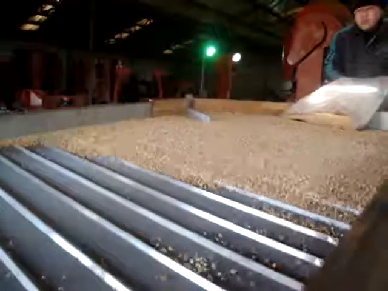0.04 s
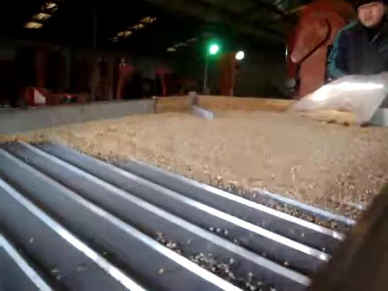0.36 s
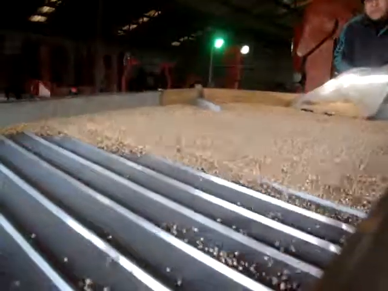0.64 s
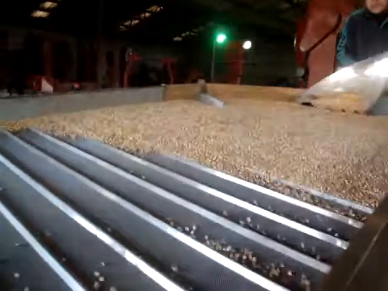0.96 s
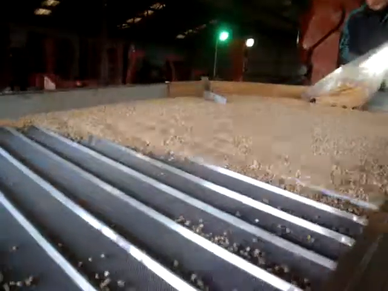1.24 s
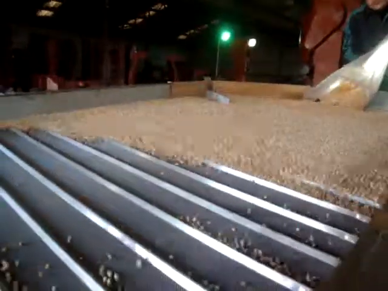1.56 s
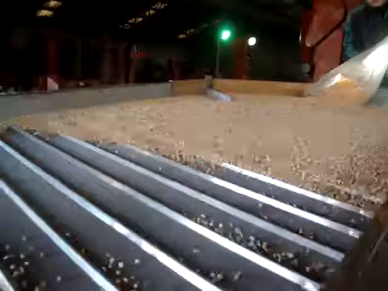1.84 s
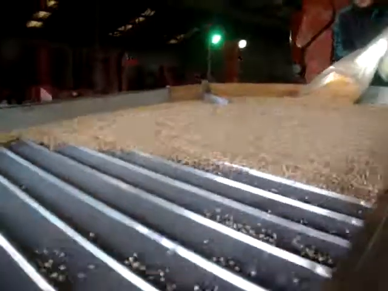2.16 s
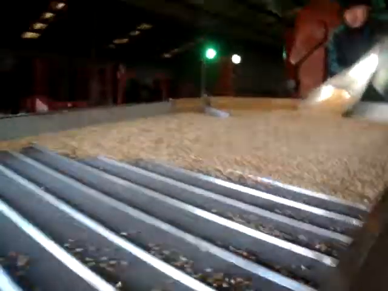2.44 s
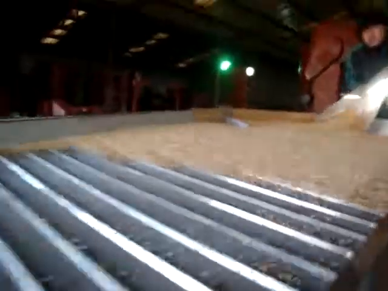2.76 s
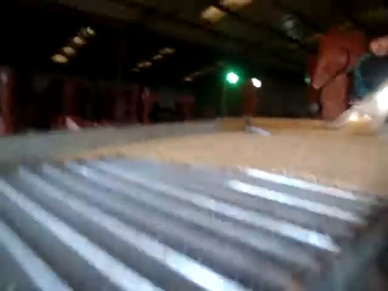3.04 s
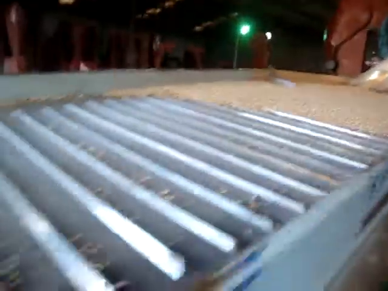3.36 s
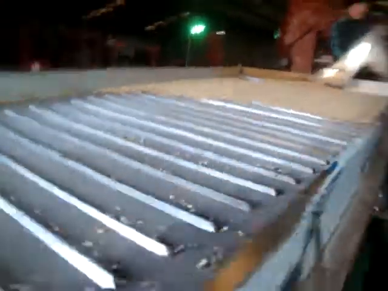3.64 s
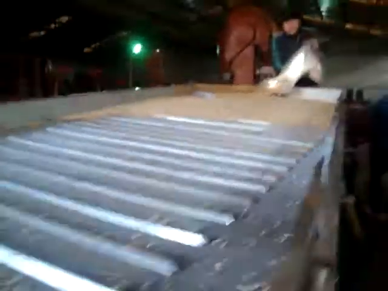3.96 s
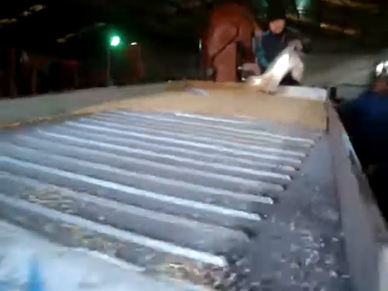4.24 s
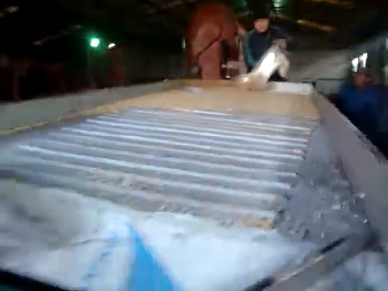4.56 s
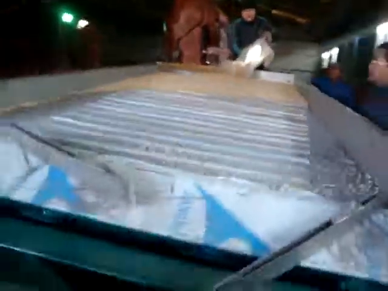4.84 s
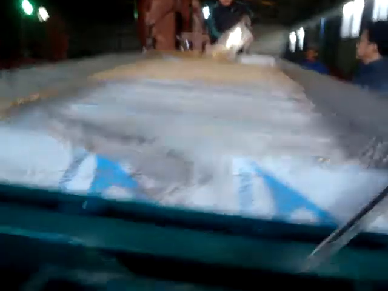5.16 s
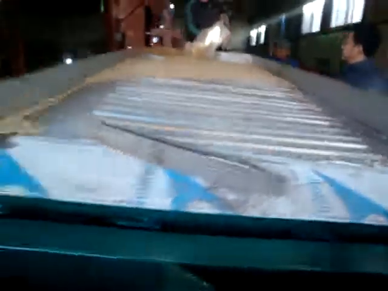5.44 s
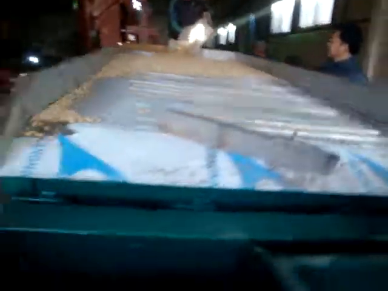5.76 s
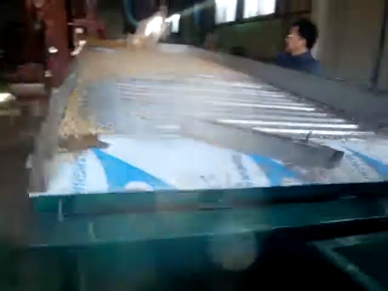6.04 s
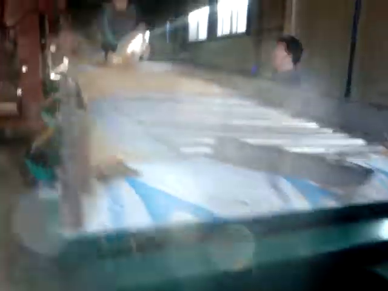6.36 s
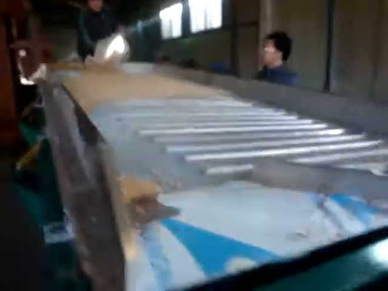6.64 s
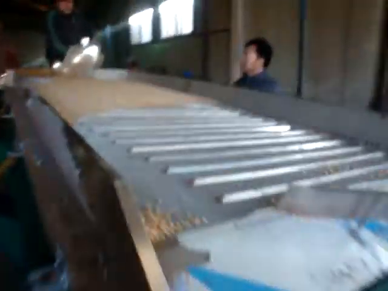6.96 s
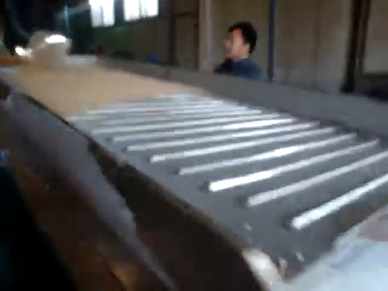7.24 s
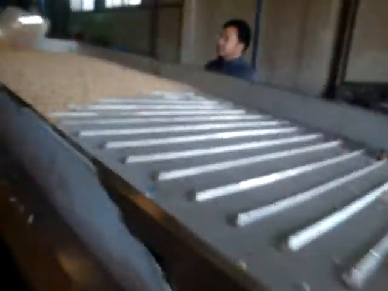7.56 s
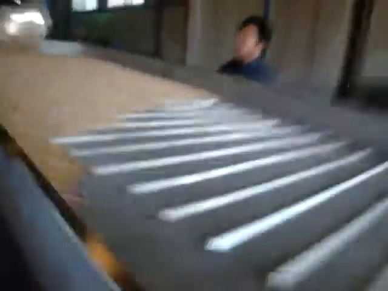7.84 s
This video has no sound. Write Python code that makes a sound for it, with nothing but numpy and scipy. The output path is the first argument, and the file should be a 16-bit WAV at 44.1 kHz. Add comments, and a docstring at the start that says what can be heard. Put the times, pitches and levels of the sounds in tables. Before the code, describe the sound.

In a workshop, a grain separator runs loudly throughout. Its steel table shakes about five times a second, throwing kernels back and forth in bright, hissing surges with dense pattering between. Underneath are a steady blower roar, a hum and a low rumble. As the close hand-held microphone moves round the table, the roar briefly swells midway and the sharp pulses soften into a sliding swish.

```python
"""In a workshop, a hand-held microphone is carried round the shaking table of a grain separator.
The steel deck swings about five times a second and throws the grain forward and back, so the hiss of
landing kernels surges twice a stroke (one full swing). Between throws, loose kernels keep pattering.
A blower under the deck roars and hums, and the frame rumbles. A fast automatic volume control
turns the roar down at each surge."""
import sys
import numpy as np
from scipy import signal
from scipy.fft import rfft, irfft
from scipy.io import wavfile

SR = 44100
rng = np.random.default_rng(int(sys.argv[2]) if len(sys.argv) > 2 else 0)


def digitize_waveform(pressure):
    """Quantize a signal to 16-bit integers and store it at the path in sys.argv[1].

    Rows of a 2-D input are taken as channels; values are limited to [-1, 1].
    """
    field = np.atleast_2d(pressure).T
    bounded = np.clip(field, -1, 1)
    quanta = np.round(bounded * 32767).astype(np.int16)
    wavfile.write(sys.argv[1], SR, quanta)


N = 357210
TIME = np.arange(N) / SR

# The walk: t/s, way round (0 = side of the table, 1 = far corner), roar/dB, rumble/dB, sifting/dB
WALK = [(0, 0, 0.7, -1.5, -1.9), (2.6, 0.08, 0.8, -3, -2.6), (3.3, .15, 1, -1.5, -1.5),
        (3.9, 0.2, 1, 1.5, -1.7), (4.3, .3, 4.5, 4, 2), (4.55, 0.1, 1.5, 3, 1), (5.1, 0.6, 1.3, 4.5, 2),
        (5.75, .55, -2.5, 1, -1.3), (6.15, 0.7, -0.3, 2.5, -0.9), (6.6, 0.4, -3, 0.5, -2.6),
        (7.3, 0.97, -1.2, 0.5, -1.6), (7.7, 1, -1.7, 0.5, 0.5), (8.1, 1, 1, -1.5, 2)]
# The grain's four moves (forward throw, back throw, rebound, slide):
# place/strokes, width/strokes, level from the side/dB, level from the far corner/dB
GRAIN_MOVES = [(0.31, 0.052, 1, -5.5), (0.88, 0.069, 1.5, -7), (1, 0.06, 1.5, -1.5), (0.88, 0.085, -2.5, 4)]
# Tone colours, or how strong each pitch is next to the others: f/Hz, level/dB
SHOWER_COLOUR = [(300, -31.5), (1200, -20.5), (2100, -7), (3000, -2.5), (4100, 0), (5000, -1), (6000, -0.5),
                 (7000, -6), (8000, -4), (9000, -3.5), (10200, -6.5)]  # thrown grain landing
SLIDE_COLOUR = [(500, -33), (1700, -11), (2400, -4), (3000, -1.5), (3800, 0.5), (5100, 0.5), (6200, -3.5),
                (10200, -11.5)]  # grain sliding over steel
SIFT_COLOUR = [(300, -29), (1200, -2), (2000, -2.5), (2600, -2), (4000, -1.5), (5200, 1.5), (6100, -2.5),
               (7100, 1), (8000, -5.5), (9000, -4.5), (10200, -13.5)]  # kernels on the deck's ridges
ROAR_COLOUR = [(100, -38.5), (200, -20.5), (280, -12.5), (340, -4), (420, -1), (540, 1.5), (630, -0.5),
               (740, 0.5), (1000, 2), (1250, -2), (1500, -6), (2000, -10), (3000, -11), (10000, -37)]  # air through the deck
RUMBLE_COLOUR = [(20, -23.5), (50, -29), (75, -16), (95, -13.5), (130, -2.5), (175, 1), (230, 3),
                 (350, 3.5), (800, -14.5)]  # the frame
# The hum's harmonics (tones at 1 to 5 times the rate of the passing blades): usual level/dB
HUM_LEVELS = [-40.5, -34.5, -26.5, -36, -43.5]
# Quiet (-) and loud (+) spots of the hum's standing waves, as the microphone passes through them:
# t/s, harmonic number, change/dB, half-length/s
STANDING_WAVES = [(3.225, 1, -12.5, .3), (4.1, 1, -6.5, 0.63), (5.2, 1, -6.5, 0.31), (6.99, 1, -4, 0.91),
                  (1.246, 2, 4, 0.35), (3.402, 2, -9, .22), (4.18, 2, 5.5, 0.25), (5.07, 2, -9, .2),
                  (7.15, 2, -7.5, 0.18), (8.05, 2, -20, 0.28), (2.9, 3, -3.5, 0.18), (3.63, 3, -4, 0.24),
                  (4.77, 3, -26, .24), (5.2, 3, 2.5, 0.22), (5.797, 3, -6.5, 0.16), (6.267, 3, 1.5, 0.086),
                  (7.417, 3, -15.5, 0.79), (2.202, 4, -10, 0.78), (3.15, 4, 7, 0.48), (4.72, 4, 10, 0.23),
                  (6.2, 4, -10, 0.34), (7.2, 4, -5, 0.17), (7.922, 4, 5.5, .3), (2.5, 5, 8.5, 0.31)]
# Faint tones, a motor whine and the blower's upper harmonics: f/Hz, level/dB
WHINES = [(878.5, -40.5), (1462.6, -47.5), (1706.4, -48.5)]
# Hollow rings in the roar: t/s, f/Hz, level/dB, half-length/s
RINGS = [(4.36, 1310, -26, 0.031), (4.36, 1820, -29, .03), (4.85, 2500, -39, 0.028),
         (5.002, 1275, -24, 0.028)]


def grain_surges(strokes, way_round, throw_db=-27.5, slide_db=-31.0, uneven_db=1.1):
    """Thrown grain lands in bright showers, then rebounds and slides with a duller swish."""
    powers = []
    for place, width, side_db, corner_db in GRAIN_MOVES:
        level_db = side_db + (corner_db - side_db) * way_round + uneven_db * drift(6.1)
        powers.append(stroke_bump(strokes, place, width) * from_db(level_db) ** 2)
    forward, back, rebound, slide = powers
    shower = colour(impacts(per_s=20000, spread_db=2.5) * np.sqrt(forward + back), SHOWER_COLOUR)
    swish = colour(rng.standard_normal(N) * np.sqrt(rebound + slide), SLIDE_COLOUR)
    return from_db(throw_db) * shower + from_db(slide_db) * swish


def grain_sifting(near_db, level_db=-25.0, uneven_db=1.23):
    """Loose kernels keep dancing on the deck's steel ridges, which ring in broad bands of pitch."""
    patter = colour(impacts(per_s=16000, spread_db=3.0), SIFT_COLOUR)
    return patter * from_db(level_db + near_db + uneven_db * drift(31))


def impacts(per_s, spread_db):
    """Kernels land at random, each a click of uneven force."""
    lands = rng.random(N) < per_s / SR
    force = from_db(spread_db * np.minimum(rng.exponential(1, N), 5))
    return lands * force * rng.choice([-1, 1], N)


def grain_clumps(grain, depth_db=1.0, span_hz=900, span_s=0.0052):
    """Each band of pitch flickers by itself, as clumps of kernels land here and there."""
    hz, s, bands = signal.stft(grain, SR, nperseg=256, noverlap=192)
    across_pitch = np.exp(-(hz[:, None] / span_hz) ** 2)
    across_time = np.exp(-(np.r_[-s[40:0:-1], s[:41]] / span_s) ** 2)
    blur = np.r_[across_pitch[:0:-1], across_pitch] * across_time
    flicker = unit(signal.fftconvolve(rng.standard_normal(bands.shape), blur, "same"))
    return signal.istft(bands * from_db(depth_db * flicker), SR, nperseg=256, noverlap=192)[1][:N]


def deck_roar(roar_db, rumble_db, air_db=-24.5, frame_db=-39, flutter_db=0.5):
    """Air roars up through the deck, and the frame rumbles under it."""
    air = colour(rng.standard_normal(N), ROAR_COLOUR) * from_db(air_db + roar_db)
    frame = colour(rng.standard_normal(N), RUMBLE_COLOUR) * from_db(frame_db + rumble_db)
    return from_db(flutter_db * drift(25)) * (air + frame)


def blower_hum(blade_hz=243.77, waver_db=0.5, speed_wander=0.00046):
    """Blades on a nearly steady shaft make a hum of several tones, joined by thin whines."""
    shaft_time = np.cumsum(1 + speed_wander * drift(1.33)) / SR
    tones = []
    for number, usual_db in enumerate(HUM_LEVELS, 1):
        change_db = sum(db * single_bump(s, half_s)
                        for s, harmonic, db, half_s in STANDING_WAVES if harmonic == number)
        tones.append((number * blade_hz, usual_db + change_db))
    hum = np.zeros(N)
    for hz, db in tones + WHINES:
        height = np.sqrt(2) * from_db(db + waver_db * drift(32))
        hum += height * np.sin(2 * np.pi * (hz * shaft_time + rng.random()))
    return hum


def hollow_rings(width_hz=35):
    """Short, hollow rings flare out of the roar and fade within a stroke."""
    rings = np.zeros(N)
    for s, hz, db, half_s in RINGS:
        rough_tone = np.sqrt(2) * drift(width_hz) * np.sin(2 * np.pi * hz * TIME)
        rings += from_db(db) * single_bump(s, half_s) * rough_tone
    return rings


def from_db(db):
    """Turns decibels into a number to multiply by."""
    return 10 ** (np.asarray(db) / 20)


def unit(x):
    """Scales x to an average size (rms) of 1."""
    return x / np.sqrt(np.mean(x ** 2) + 1e-20)


def curves(rows):
    """Joins each column's points with straight lines in time."""
    s, *columns = np.transpose(rows)
    return [np.interp(TIME, s, column) for column in columns]


def colour(x, tone_colour):
    """Gives x a tone colour, at average size 1."""
    hz, db = np.transpose(tone_colour)
    all_hz = np.fft.rfftfreq(N, 1 / SR)
    gain = from_db(np.interp(np.log(all_hz + 1), np.log(hz), db))
    return unit(irfft(rfft(x) * gain, N))


def drift(rate_hz):
    """A random wobble of average size 1, up to about this rate."""
    hz = np.fft.rfftfreq(N, 1 / SR)
    keep_slow = np.exp(-(hz / rate_hz) ** 2) * (hz > 0)
    return unit(irfft(rfft(rng.standard_normal(N)) * keep_slow, N))


def stroke_bump(strokes, place, width):
    """A smooth bump that comes once in every stroke."""
    distance = (strokes - place + 0.5) % 1 - 0.5
    return np.exp(-0.5 * (distance / width) ** 2)


def single_bump(s, half_s):
    """A smooth bump that comes only once, around time s."""
    return np.exp(-((TIME - s) / half_s) ** 2)


def scene(stroke_hz=5.283, lull_side=0.11, lull_corner=0.4, grain_follows=0.54):
    """One crank drives deck and grain. Round the table, the sound of throws gives way to sliding."""
    strokes = stroke_hz * TIME
    way_round, roar_db, rumble_db, sift_db = curves(WALK)
    # The deck stands still at both ends of its swing, and its noise sinks for a moment.
    still = stroke_bump(strokes, place=0.07, width=0.052) + stroke_bump(strokes, place=0.57, width=0.075)
    lull = still * (lull_side + (lull_corner - lull_side) * way_round)
    sifting = (1 - grain_follows * lull) * grain_sifting(sift_db)  # loose kernels only partly settle
    grain_strokes = strokes + 0.011 * drift(4.3)  # the grain lands a little early or late
    grain = grain_clumps(sifting + grain_surges(grain_strokes, way_round))
    mix = blower_hum() + (1 - lull) * deck_roar(roar_db, rumble_db) + hollow_rings() + grain
    return np.array([mix, mix])


def record(dry, threshold_db=-18.0, squeeze=0.64, response_s=0.0045, treble_weight=1.9, top_hz=10120):
    """A fast volume control, keenest on treble, holds each surge down; the highest treble is cut off."""
    power = (dry ** 2 + treble_weight * np.diff(dry, prepend=0) ** 2).mean(0)
    memory = np.exp(-1 / (response_s * SR))
    smooth_power = signal.lfilter([1 - memory], [1, -memory], power, zi=[power.mean()])[0]
    over_db = np.maximum(10 * np.log10(smooth_power + 1e-12) - threshold_db, 0)
    held = dry * from_db(0.2 - squeeze * over_db)  # 0.2 dB is a small steady lift
    lowpass = signal.firwin(801, top_hz, window=("kaiser", 9), fs=SR)
    return signal.oaconvolve(held, lowpass[None], "same")


dry = scene()
out = record(dry)
digitize_waveform(out)
```